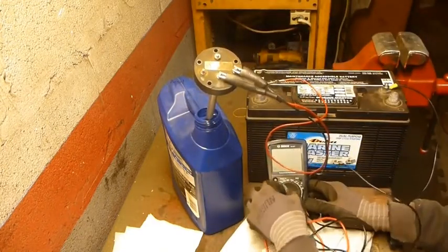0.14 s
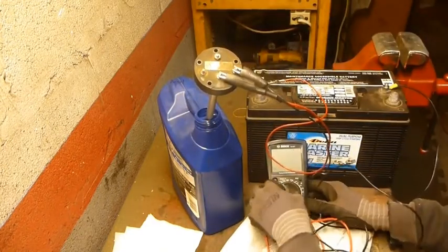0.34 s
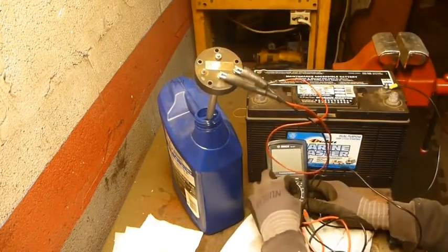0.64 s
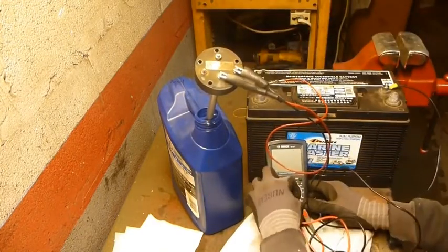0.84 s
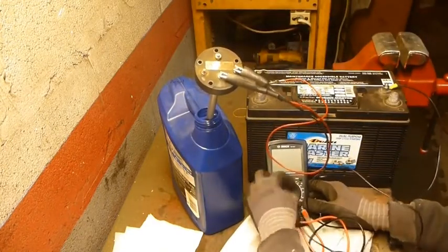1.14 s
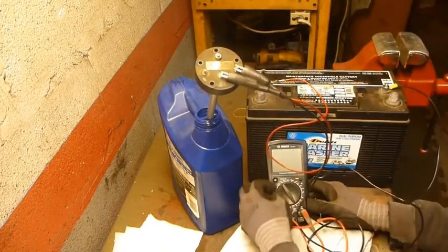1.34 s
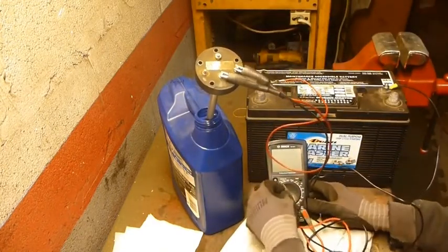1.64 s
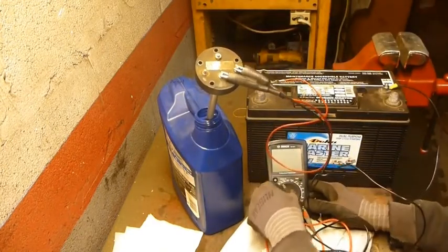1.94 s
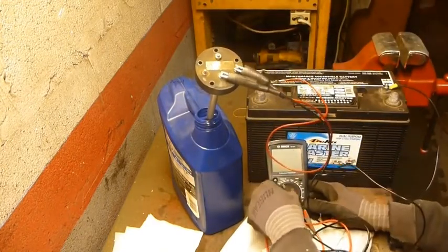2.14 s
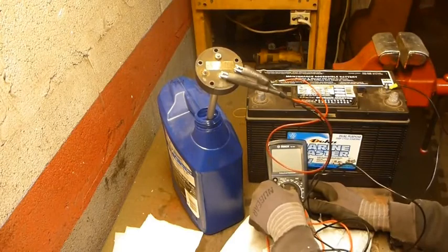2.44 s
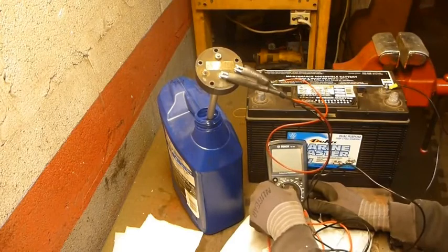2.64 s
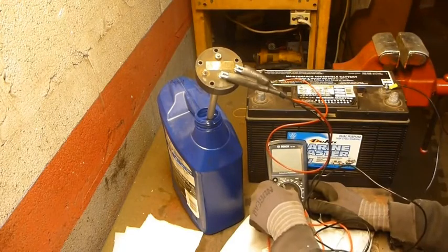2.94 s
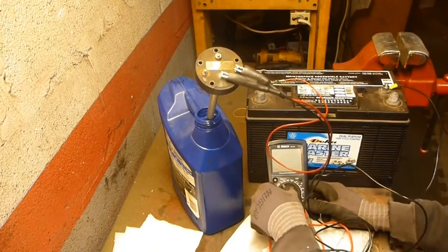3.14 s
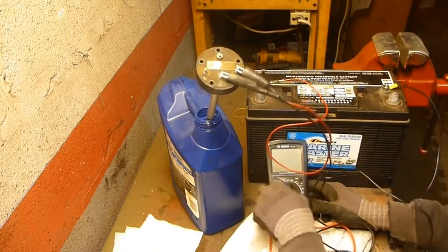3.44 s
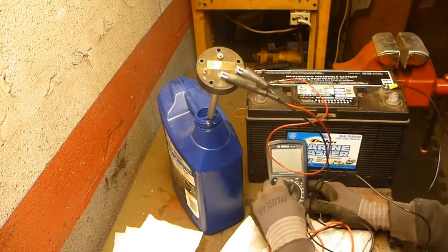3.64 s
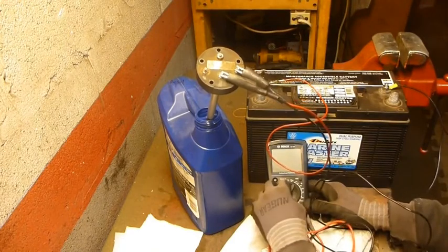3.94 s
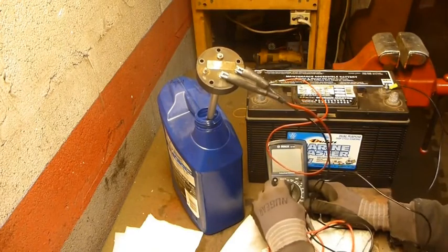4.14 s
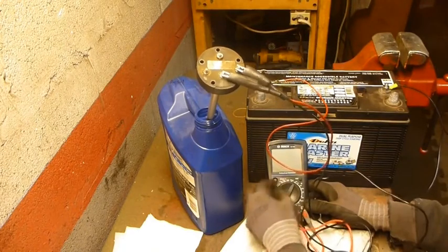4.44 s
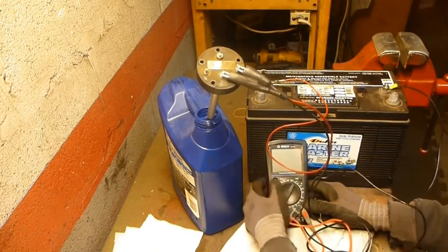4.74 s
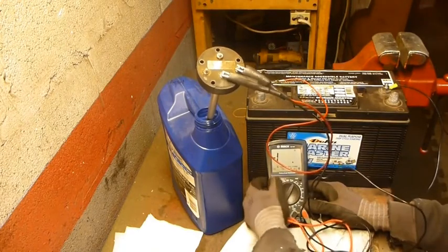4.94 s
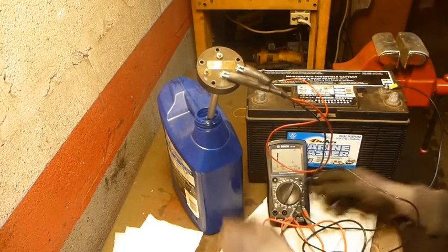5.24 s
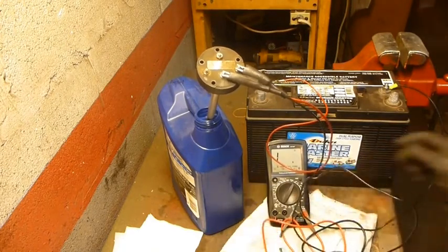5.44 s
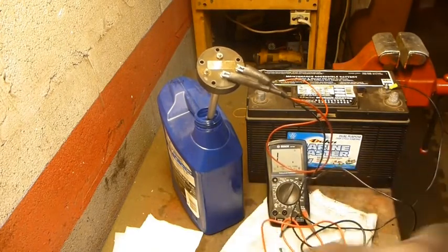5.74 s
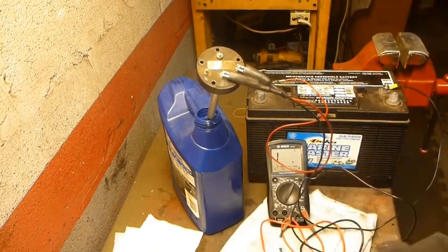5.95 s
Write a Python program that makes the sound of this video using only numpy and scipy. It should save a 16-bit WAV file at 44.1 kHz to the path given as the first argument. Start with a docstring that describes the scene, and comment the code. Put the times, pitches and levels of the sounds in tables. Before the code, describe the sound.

A plastic rotary switch clicks sharply through its detents in two quick runs, over faint hiss and hum in a garage, then gloves rustle.

```python
"""A gloved hand turns the rotary dial of a handheld meter through its detents, in two quick runs, in a garage.
At each detent the sprung switch scrapes, snaps home and chatters: noisy contact forces that ring the modes
of the hollow plastic case. Gloves and sleeves rustle as bands of friction noise, and light taps sound as
short noise swells. Scattered echoes form the garage; a soft hiss and a weak, wavering mains hum lie under it."""
import sys
import numpy as np
from scipy import signal
from scipy.fft import rfft, irfft
from scipy.io import wavfile
from scipy.ndimage import uniform_filter1d

SR = 44100
rng = np.random.default_rng(int(sys.argv[2]) if len(sys.argv) > 2 else 0)


def persist_wave(psi):
    """Save psi, clipped to +-1, as 16-bit WAV."""
    counts = np.round(np.clip(psi, -1, 1) * 32767).astype(np.int16)
    wavfile.write(sys.argv[1], SR, np.atleast_2d(counts).T)


N = 268789

# Snaps of the switch; the grip of the hand favours one hollow clack and one ring of the case.
# Each row: time in seconds, relative level in dB, rise time of the scrape before it in seconds,
# clack frequency in Hz, clack boost in dB, ring frequency in Hz.
SNAP_EVENTS = [(0.4233, -3, 0.00028, 2000, 7, 4100), (0.4334, -5, 0.0012, 3450, 10, 2100),
               (0.4643, -1.5, 0.00049, 1640, 5, 10200), (.4760, -3, 0.0017, 1400, 1, 4120),
               (0.5475, -4, 0.00055, 495, 8.5, 2450), (0.5561, -4, 0.0013, 514, -2, 4560),
               (0.6313, -5, 0.00065, 3550, 4.5, 6300), (0.6744, -3.5, 0.0013, 840, 11, 5900),
               (0.7023, -4, .0010, 890, 11, 1820), (0.7557, -6.5, 0.0014, 900, 4, 3500),
               (0.8237, -2, 0.0013, 700, 10, 2600), (0.8794, -2, 0.0023, 1410, 4, 2330),
               (3.5104, -0.5, 0.0004, 556, 9.5, 2300), (3.5174, 0, .0008, 890, 10, 2930),
               (3.5886, -2, 0.0008, 2540, 4, 2580), (3.6667, -6, 0.0015, 1230, 6.5, 2430)]


def amp(db):
    """Decibels are logarithmic: 20 dB is a tenfold gain in amplitude."""
    return 10 ** (np.asarray(db) / 20)


def unit(x):
    """Normalisation: scales a signal to an rms of 1."""
    return x / np.sqrt(np.mean(x ** 2) + 1e-20)


def read(points, hz):
    """Interpolation: joins table points by straight lines over log frequency."""
    f, value = np.transpose(points)
    return np.interp(np.log(hz + 1), np.log(f), value)


def add(mix, s, sound):
    """Superposition: sums a sound into the mix from s seconds on."""
    part = mix[round(s * SR):][:len(sound)]
    part += sound[:len(part)]


def bell(hz, centre_hz, octaves):
    """Gaussian band: a hump of height 1 over log frequency."""
    return np.exp(-.5 * (np.log2((hz + 1) / centre_hz) / octaves) ** 2)


def ringing(gain):
    """Minimum phase: the causal impulse response whose phase follows from its log gain by Hilbert transform."""
    both_sides = np.r_[gain, gain[-2:0:-1]]
    log_gain = np.log(np.maximum(both_sides, 1e-5))
    return np.fft.ifft(np.exp(np.conj(signal.hilbert(log_gain)))).real


def drift(rate_hz):
    """Low-passed noise: a slow random fluctuation of rms 1."""
    hz = np.fft.rfftfreq(N, 1 / SR)
    spectrum = rfft(rng.standard_normal(N)) * np.exp(-(hz / rate_hz) ** 2)
    return unit(irfft(spectrum, N))


def background(hiss_db=-44, waver=0.26, waver_hz=7.1, wander_rad=0.67, wander_hz=2.9):
    """Stationary noise shaped in frequency, plus hum lines randomly modulated in amplitude and phase."""
    # Room hiss. Each row: frequency in Hz, relative spectral density in dB per Hz.
    hiss_colour = [(25, -23), (50, -16.5), (85, -6.5), (125, -0.5), (280, 1), (520, -2.5), (1000, -7),
                   (2000, -13), (4000, -19.5), (8000, -25), (11000, -29.5), (13200, -31.5), (15700, -34)]
    # Mains hum lines. Each row: frequency in Hz, rms level in dB before wavering.
    hum_lines = [(120, -67), (240, -67), (360, -60.5), (479.5, -57), (600, -62), (720, -80), (1320, -71)]
    hz, t = np.fft.rfftfreq(N, 1 / SR), np.arange(N) / SR
    hiss = unit(irfft(rfft(rng.standard_normal(N)) * amp(read(hiss_colour, hz)), N))
    hum = np.zeros(N)
    for f, db in hum_lines:
        level = amp(db) * (1 + waver * drift(waver_hz))
        phase = 2 * np.pi * (f * t + rng.random()) + wander_rad * drift(wander_hz)
        hum += level * np.sin(phase)
    return amp(hiss_db) * hiss + np.sqrt(2) * hum  # a sine peaks at sqrt(2) times its rms


def sleeves(flutter_db=2, flutter_hz=12):
    """Friction noise of cloth, whose level swells unevenly with the motion of the arms."""
    # Motion of the arms. Each row: time in seconds, level in dB before flutter.
    motion = [(0, -83), (.16, -56), (.3, -60), (1.2, -65), (4.6, -63), (5.19, -49.5), (5.4, -57),
              (5.7, -51), (6.09, -56.5)]
    # Spectrum of rubbing cloth. Each row: frequency in Hz, relative spectral density in dB per Hz.
    cloth_colour = [(50, -27), (160, 1), (500, 3), (1500, -5.5), (2500, -13.5), (4000, -17), (8000, -29.5),
                    (15000, -27)]
    colour = amp(read(cloth_colour, np.fft.rfftfreq(N, 1 / SR)))
    cloth = unit(irfft(rfft(rng.standard_normal(N)) * colour, N))
    motion_db = np.interp(np.arange(N) / SR, *np.transpose(motion))
    return cloth * amp(motion_db + flutter_db * drift(flutter_hz))


def chatter(t, scrape, settle):
    """Random excitation: tiny contacts swell up to t = 0 and die away, whitened to an even spectrum."""
    contacts = rng.standard_normal(len(t))
    envelope = np.exp(-np.where(t < 0, (t / scrape) ** 2, t / settle))
    spectrum = rfft(contacts * envelope)
    power = uniform_filter1d(abs(spectrum) ** 2, size=45)
    return irfft(spectrum / np.sqrt(power + 1e-12))


def case_gain(hz):
    """Modal superposition: the powers of the resonances and of the crack between them add up."""
    # Ringing modes of the plastic case. Each row: frequency in Hz, width in Hz, relative peak level in dB.
    modes = [(202, 130, 9), (476, 44, 14), (900, 130, 10), (1206, 190, 9), (1690, 110, 9.5), (2000, 67, 14),
             (2300, 197, 11.5), (2600, 130, 10), (3650, 580, 7.5), (4560, 320, 5.5), (6070, 520, 3.5),
             (8530, 720, 3), (10200, 650, 0), (13460, 790, 3.5)]
    # Broad crack between the modes. Each row: frequency in Hz, relative level in dB.
    crack = [(50, -40), (130, -4), (600, 0.5), (1450, -13.5), (3200, -5.5), (5200, -1), (7500, -6),
             (11000, -3), (14500, -8), (16500, -17)]
    power = amp(read(crack, hz)) ** 2
    for f, width, db in modes:
        detuning = (hz ** 2 - f ** 2) / (width * hz + 1)
        power += amp(db) ** 2 / (1 + detuning ** 2)
    return np.sqrt(power) * hz ** 2 / np.hypot(hz ** 2, 120 ** 2)  # so small a box radiates no deep bass


def snap_force(t, scrape, strain_db=-16, strain_s=0.0056, strain_hz=2000,
               strike_db=-9, strike_s=0.00036, strike_hz=5000):
    """Stick and release: the spring rubs dully up the notch, then strikes home brightly amid its chatter."""
    settle = 0.0024 + 0.47 * scrape  # seconds; a slowly scraping snap also chatters longer
    low_pass = signal.butter(1, strain_hz, fs=SR)
    high_pass = signal.butter(1, strike_hz, "highpass", fs=SR)
    strain = signal.lfilter(*low_pass, chatter(t, strain_s, settle))
    strike = signal.lfilter(*high_pass, chatter(t, strike_s, strike_s))
    return amp(strain_db) * strain + amp(strike_db) * strike + chatter(t, scrape, settle)


def dial(size=4096, snap_db=4, clack_octaves=0.25, ring_db=5.5, ring_octaves=0.1):
    """Source and filter: each snap drives the case modes, whose balance follows its speed and the hand's grip."""
    # Runs of detents. Each row: start in seconds, treble boost at the start in dB.
    runs = [(.42, 3.5), (3.51, 1)]
    # The hand takes hold at the start of each run and bears down: the low knock comes in, the treble fades.
    full_knock_db, loose_knock_db, grip_s, treble_db_per_s = 5.3, -8, 0.055, -7
    # A quick snap is brighter than a slow one.
    treble_db_per_doubling, usual_scrape_s = -1.3, 0.0009
    # A rebound, hard on the heels of a snap, is duller.
    rebound_treble_db, rebound_gap_s = -0.5, 0.02
    lead = 0.016  # seconds of force before the snap
    t, hz, out = np.arange(size) / SR - lead, np.fft.rfftfreq(size, 1 / SR), np.zeros(N)
    case = case_gain(hz)
    knock_band = 1 / (1 + (hz / 360) ** 4)
    treble_band = 1 - 1 / (1 + (hz / 5200) ** 4)
    rebounds = np.diff([row[0] for row in SNAP_EVENTS], prepend=-np.inf) < rebound_gap_s
    for (s, db, scrape, clack_hz, clack_db, ring_hz), rebound in zip(SNAP_EVENTS, rebounds):
        run_start, run_treble_db = min(runs, key=lambda run: abs(run[0] - s))
        into_run = max(s - run_start, 0)
        slowness = np.log2(scrape / usual_scrape_s)
        knock_db = full_knock_db + loose_knock_db * np.exp(-into_run / grip_s)
        treble_db = run_treble_db + treble_db_per_s * into_run
        treble_db += treble_db_per_doubling * slowness + rebound_treble_db * rebound
        grip_db = clack_db * bell(hz, clack_hz, clack_octaves) + ring_db * bell(hz, ring_hz, ring_octaves)
        body = ringing(case * amp(grip_db + knock_db * knock_band + treble_db * treble_band))
        snap = signal.fftconvolve(snap_force(t, scrape), body)
        add(out, s - lead, amp(snap_db + db) * snap)
    return out


def brush(s, length, db, centre_hz, octaves, grain=0.35):
    """Friction noise: one grainy, band-limited swell centred on s seconds; returns (start, sound)."""
    n = int(length * SR)
    fibres = rng.standard_normal(n) * np.exp(grain * rng.standard_normal(n))
    rub = irfft(rfft(fibres) * bell(np.fft.rfftfreq(n, 1 / SR), centre_hz, octaves), n)
    return s - length / 2, amp(db) * unit(rub) * np.hanning(n)


def gloves(swish_hz=12900, swish_octaves=0.98, drag_db=1, drag_hz=172, drag_octaves=0.65, scuff_octaves=0.19,
           tick_s=0.0054, tick_hz=3800, tick_octaves=0.28,
           thud_delay_s=0.0055, thud_s=0.013, thud_db=2, thud_hz=800, thud_octaves=0.8):
    """Sliding friction swishes over a low drag, or scuffs; a tap ticks, then thuds softly as the meter rocks."""
    # Glove sliding off case and leads. Each row: centre in seconds, length in seconds,
    # rms level in dB before the swell shapes it.
    swishes = [(4.904, 0.026, -63), (5.17, .17, -54), (5.28, 0.055, -53), (5.953, 0.064, -52)]
    # Faint scuffs of gloves and leads on the bench as the hands withdraw. Each row: centre in seconds,
    # length in seconds, rms level in dB before the swell shapes it, centre frequency in Hz.
    scuffs = [(5.2, 0.063, -54, 2000), (5.453, .04, -57, 3500), (5.709, 0.099, -56, 1510),
              (6.01, .15, -58, 3900)]
    # Light taps on the meter. Each row: time in seconds, rms level of the tick in dB before its swell.
    taps = [(1.132, -40), (5.523, -52)]
    out = np.zeros(N)
    for s, length, db in swishes:
        add(out, *brush(s, length, db, swish_hz, swish_octaves))
        add(out, *brush(s, length, db + drag_db, drag_hz, drag_octaves))
    for row in scuffs:
        add(out, *brush(*row, scuff_octaves))
    for s, db in taps:
        add(out, *brush(s, tick_s, db, tick_hz, tick_octaves))
        add(out, *brush(s + thud_delay_s, thud_s, db + thud_db, thud_hz, thud_octaves))
    return out


def reflections(t60_table, delay, size=22050):
    """Exponential decay: sparse echoes of energy 1 after a delay, each band dying at its own speed."""
    taps = rng.standard_normal(size) * (rng.random(size) < 5000 / SR)  # about 5000 echoes a second
    hz, t, bands = signal.stft(taps, SR, nperseg=128)
    decay = amp(-60 * t / read(t60_table, hz)[:, None])
    tail = signal.istft(bands * decay, SR)[1]
    return np.r_[np.zeros(int(delay * SR)), tail / np.linalg.norm(tail)]


def garage(x, near_db=-8, near_t60=0.11, far_db=-15, count=3):
    """Early and late reflection: near surfaces answer first, the room later; paths shift as the hand moves."""
    # Reverberation of the garage. Each row: frequency in Hz, time to fall by 60 dB in seconds.
    room_t60 = [(200, 0.16), (1000, 0.36), (4000, 0.55), (9000, 0.36), (15000, 0.5)]
    # What bench and walls throw back. Each row: frequency in Hz, gain in dB.
    echo_colour = [(200, -3), (520, 4.5), (900, 1.5), (1500, -2.5), (2400, -1.5), (4000, -1), (7000, 0),
                   (13000, -3)]
    out, t = x.copy(), np.arange(N) / SR
    colour = amp(read(echo_colour, np.fft.rfftfreq(2048, 1 / SR)))
    thrown = signal.fftconvolve(x, ringing(colour))[:N]
    # successive snaps take the sets of echo paths in turn, switching 4 ms ahead of each
    turn = np.searchsorted([row[0] for row in SNAP_EVENTS], t + 0.004) % count
    for k in range(count):
        near = reflections([(1000, near_t60)], delay=0.005)
        far = reflections(room_t60, delay=0.016)
        for db, echoes in (near_db, near), (far_db, far):
            out += amp(db) * signal.fftconvolve(thrown * (turn == k), echoes)[:N]
    return out


def scene():
    """Superposition: dial, gloves and sleeves echo in the garage, over the background."""
    return (garage(dial() + gloves() + sleeves()) + background())[None]


def record(dry, threshold_db=-41, squeeze=0.13, attack_s=0.2, recovery_db_per_s=0.8, ceiling=0.5, edge_hz=15900):
    """Compression with slow recovery, soft saturation, notch filters, then a low-pass band limit."""
    # Narrow bands that are cut out. Each row: centre in Hz, width in Hz.
    notches = [(2895, 170), (7830, 50), (11700, 850)]
    x, keep = dry[0], np.exp(-1 / (attack_s * SR))
    power = signal.lfilter([1 - keep], [1, -keep], x ** 2)
    power_db = 10 * np.log10(power + 1e-12)
    wanted_cut_db = squeeze * np.maximum(power_db - threshold_db, 0)
    # a running maximum against a rising ramp lets the cut fall no faster than the recovery rate
    recovered = np.arange(N) / SR * recovery_db_per_s
    cut_db = np.maximum.accumulate(wanted_cut_db + recovered) - recovered
    x = ceiling * np.tanh(x * amp(-cut_db) / ceiling)
    for hz, width in notches:
        x = signal.lfilter(*signal.iirnotch(hz, hz / width, SR), x)
    band_limit = signal.firwin(301, edge_hz, window=("kaiser", 8), fs=SR)
    return signal.oaconvolve(x, band_limit, "same")[None]


dry = scene()
out = record(dry)
persist_wave(out)
```